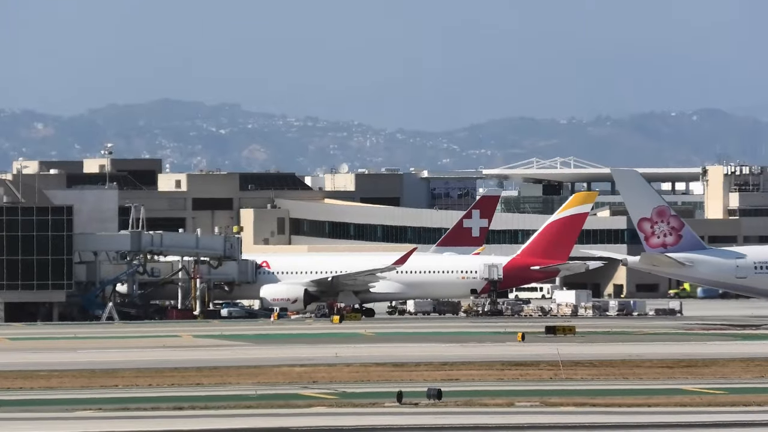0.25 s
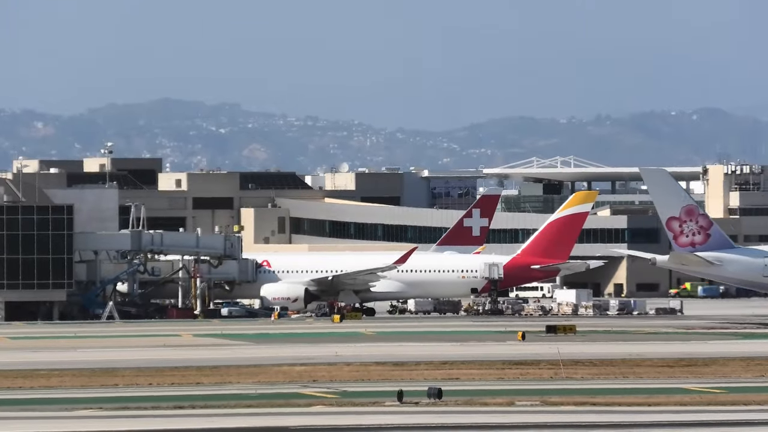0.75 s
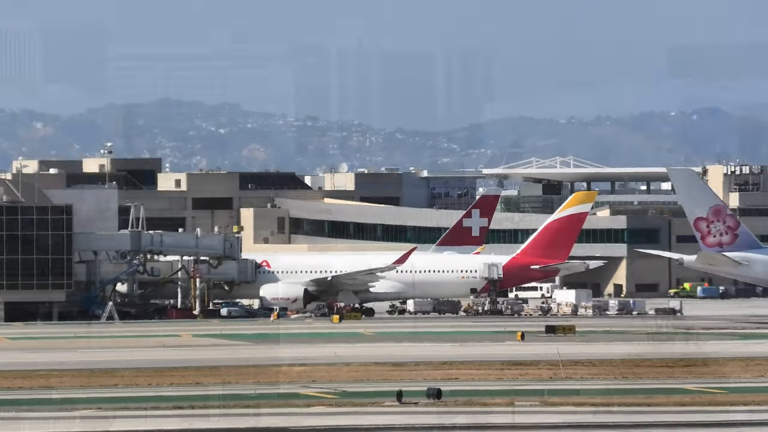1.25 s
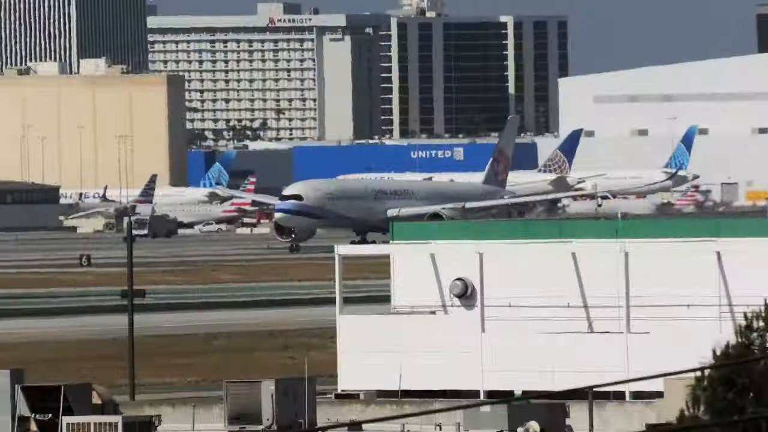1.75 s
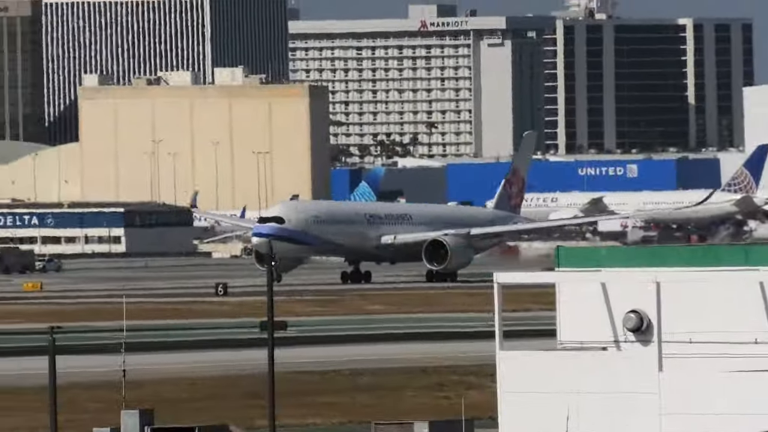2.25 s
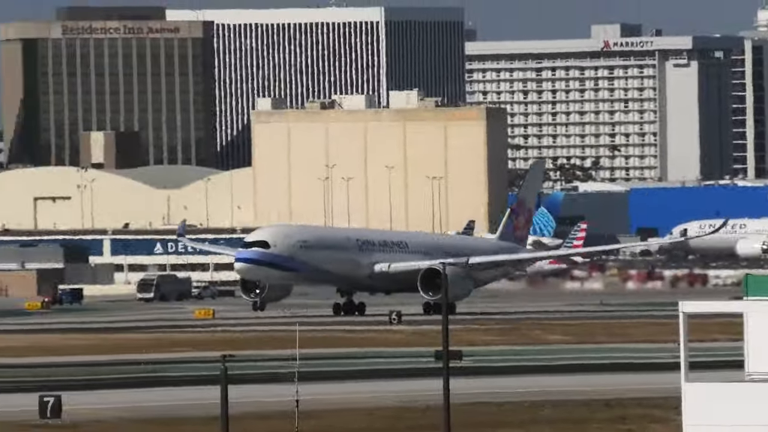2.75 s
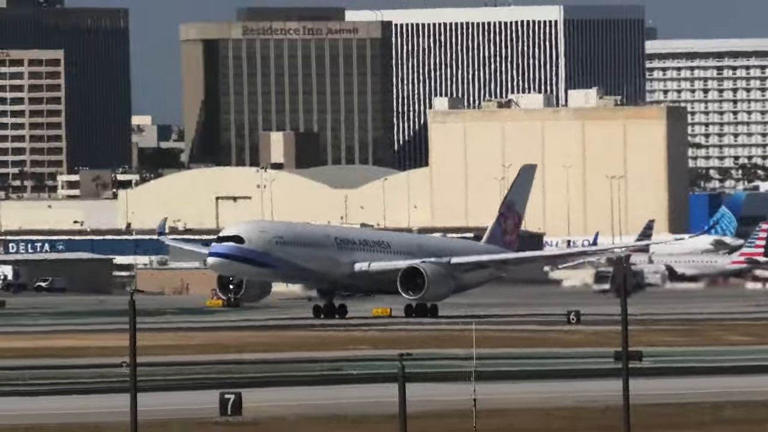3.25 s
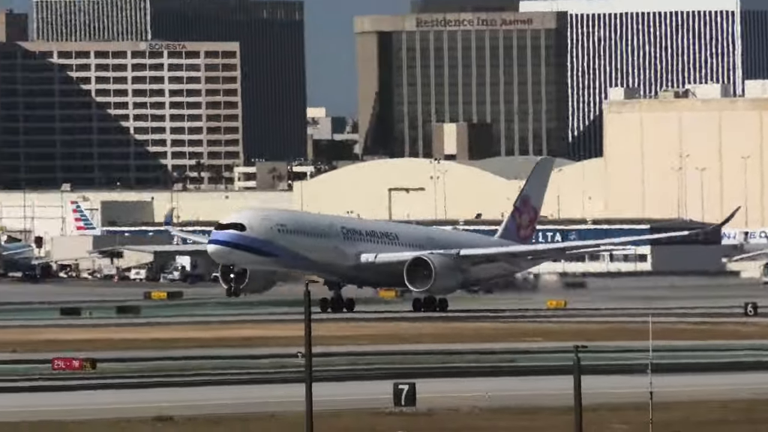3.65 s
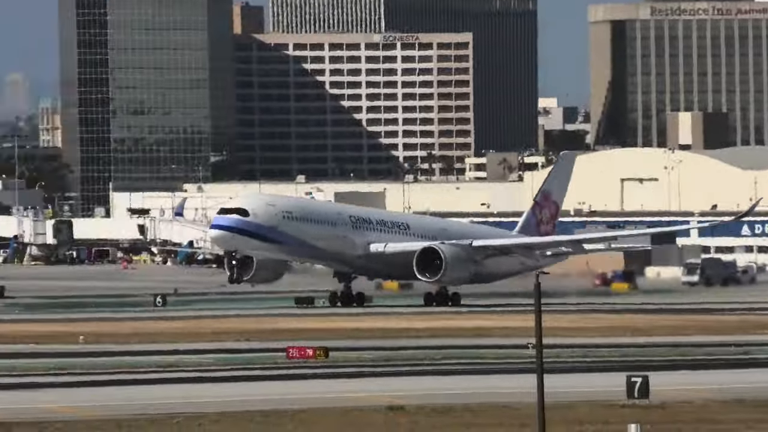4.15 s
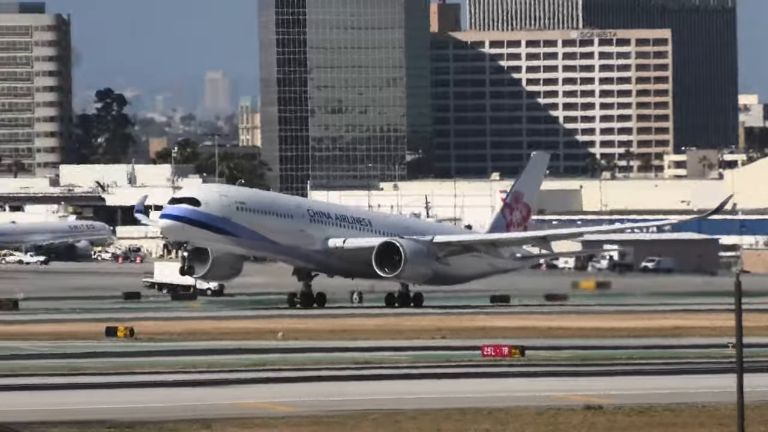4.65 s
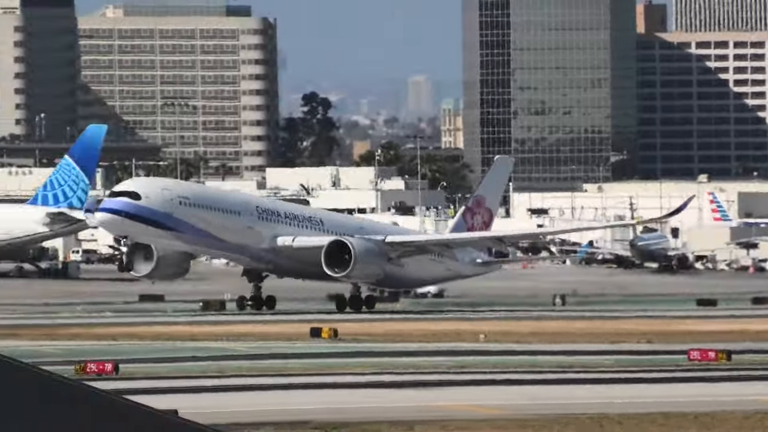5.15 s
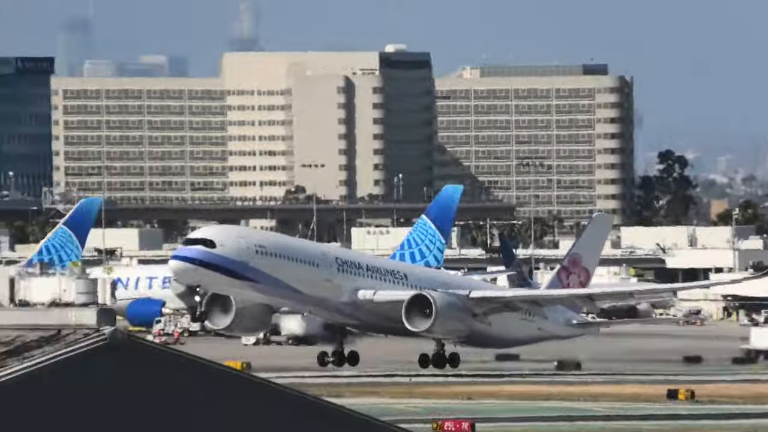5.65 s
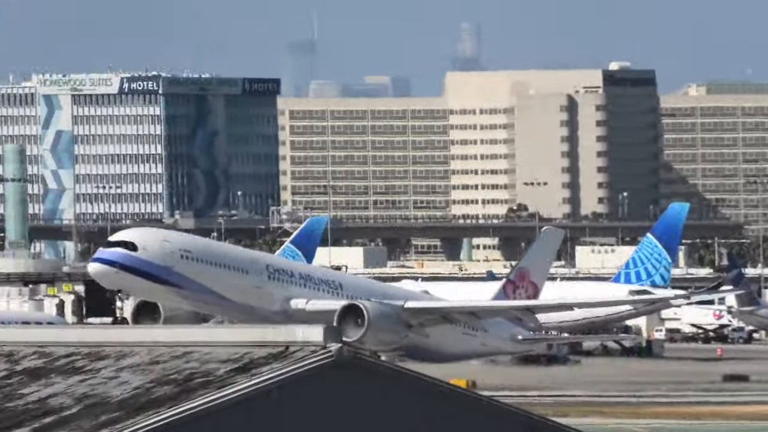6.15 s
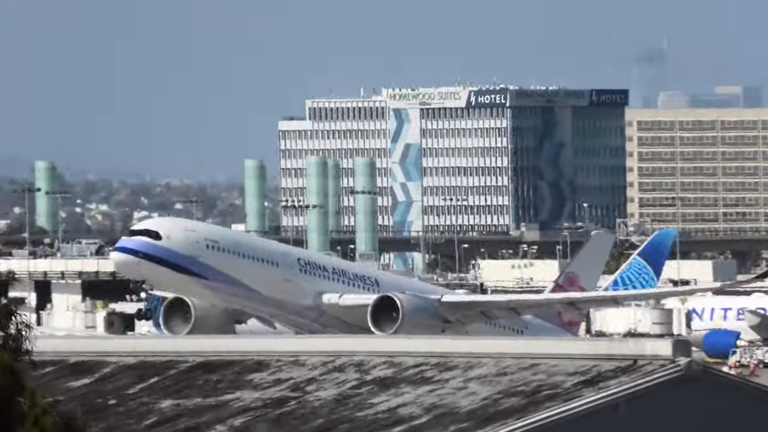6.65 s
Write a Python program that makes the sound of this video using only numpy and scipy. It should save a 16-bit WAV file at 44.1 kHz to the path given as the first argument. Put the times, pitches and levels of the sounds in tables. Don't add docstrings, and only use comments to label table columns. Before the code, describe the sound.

A jet's buzz-saw drone fades out, then gusty wind batters the microphone as a second jet's broad roar swells, lifts off and holds.

```python
import sys
import numpy as np
from scipy import signal
from scipy.io import wavfile
from scipy.ndimage import uniform_filter1d, minimum_filter1d

SR = 44100
rng = np.random.default_rng(int(sys.argv[2]) if len(sys.argv) > 2 else 0)


def convert_level_to_amplitude(level_db):
    exponent = np.asarray(level_db, float) / 20
    return 10 ** exponent


def inscribe(sig):
    pcm = np.round(np.clip(np.atleast_2d(sig).T, -1, 1) * 32767)
    wavfile.write(sys.argv[1], SR, pcm.astype(np.int16))


N = 303849

# (t/s, roar level/dB, exhaust rumble over roar/dB)
FIRST_PASS = [
    (0.0, -22.5, 2),
    (0.13, -22, -3.5),
    (0.27, -19.5, -1.5),
    (0.6, -23.5, 5),
    (1.06, -24.5, 5.5),
    (1.4, -27, -3),
    (1.556, -25.5, 2.5),
    (1.71, -37, 10),
    (1.77, -59, 9),
]


def evened(x):
    return x / np.sqrt(np.mean(x ** 2) + 1e-20)


def read(points, hz):
    f, value = np.transpose(points)
    return np.interp(np.log(hz + 1), np.log(f + 1), value)


def follow(rows, t):
    s, *columns = np.transpose(rows)
    return [np.interp(t, s, c) for c in columns] + [(t >= s[0]) & (t <= s[-1])]


def bump(x, width):
    return np.exp(-(x / width) ** 2)


def log_bump(hz, mid_hz, width):
    return bump(np.log((hz + 1) / mid_hz), width)


def shelf(hz, lo_hz, hi_hz):
    return np.clip(np.log((hz + 1) / lo_hz) / np.log(hi_hz / lo_hz), 0, 1)


def drift(shape, spans):
    x = rng.standard_normal(shape)
    for axis, size in enumerate(spans):
        for _ in range(2):
            x = uniform_filter1d(x, size=size, axis=axis)
    return evened(x)


def noise(colour_db, ref_hz, patchy_db, flicker_db, size=1024):
    hop = size // 4
    t = np.arange(N // hop + 5)[:, None] * hop / SR
    hz = np.fft.rfftfreq(size, 1 / SR)
    gain = convert_level_to_amplitude(colour_db(t, hz) + 0 * t)
    band = (hz > ref_hz[0]) & (hz < ref_hz[1])
    gain = gain / np.sqrt((gain[:, band] ** 2).sum(axis=1, keepdims=True))
    patches_db = patchy_db * drift(gain.shape, (5, 8))
    gain = gain * convert_level_to_amplitude(patches_db + flicker_db * drift(t.shape, (3,)))
    z = rng.standard_normal(gain.shape) + 1j * rng.standard_normal(gain.shape)
    sound = signal.istft((z * gain).T, nperseg=size, noverlap=size - hop)[1][:N]
    return sound * np.sqrt(3 / 2)


def ducking_db(t):
    # (strongest push t/s, ducking/dB, length/s)
    gusts = [(0.056, 11, .08), (1.172, 11, 0.054), (1.247, 5, 0.17), (1.768, 14, 0.068),
             (1.823, 9.5, 0.075), (2.02, 8, 0.21), (2.138, 4.5, 0.15), (2.286, 9, .06), (2.362, 20, 0.034),
             (2.403, 16, 0.067), (2.505, 8, 0.13), (2.613, 8, 0.075), (2.655, 6.5, 0.15),
             (2.761, 8.5, 0.076), (2.86, 5, .06), (2.931, 9.5, 0.089), (2.99, 10, 0.074),
             (3.133, 11.5, 0.1), (3.235, 4, .12), (3.33, 2, 0.22), (3.548, 9.5, 0.088), (3.625, 6.5, 0.071),
             (3.92, 10, 0.11), (4.375, 3.5, 0.26), (4.725, 15, 0.055), (4.802, 15, 0.22), (5.088, 4, 0.1),
             (5.375, 4.5, 0.065), (5.745, 3, 0.11), (6.42, 3, .2)]
    rise = 0.31
    return sum(db * np.interp(t, [s - rise * length, s, s + (1 - rise) * length], [0, 1, 0])
               for s, db, length in gusts)


def wind_db(t):
    # (t/s, level/dB)
    strength = [(0.0, -17), (0.06, -10), (0.23, -31), (1.13, -23.5), (1.15, -8.5), (1.61, -23), (1.63, -18),
                (4.09, -15), (4.24, -31.5), (4.32, -17.5), (4.57, -29), (4.8, -13.5), (4.83, -21.5),
                (5.45, -23.5), (5.58, -25), (5.72, -24), (5.91, -26), (6.89, -20.5)]
    # (t/s, depth/dB)
    lulls = [(.33, 11), (.5, 6.5), (.87, 9), (1.87, 8), (2.44, 14), (2.79, 14.5), (2.87, 6), (3.02, 10),
             (3.18, 8), (3.57, 13), (3.95, 9), (5.68, 5), (6.0, 7), (6.5, 9)]
    lull_db = sum(db * bump(t - s, 0.029) for s, db in lulls)
    return follow(strength, t)[0] + 0.41 * ducking_db(t) - lull_db


def lobes_db(s, hz):
    # (f/Hz, width/log units, level/dB)
    lobes = [(1150, 0.26, -8.5), (2030, 0.55, -2)]
    # (t/s, length/s, band f/Hz, lift/dB)
    sweeps = [(0.068, .05, 2100, 4), (0.201, .07, 2200, 7), (.16, 0.065, 1250, 4.5),
              (0.303, 0.065, 1200, 8.5), (0.417, .08, 800, 4.5), (0.552, 0.055, 2100, 2),
              (0.702, 0.047, 3000, 3), (0.858, 0.088, 1150, 6), (1.03, 0.092, 850, 3.5),
              (1.023, 0.05, 2000, 3), (1.206, 0.033, 1200, -1), (1.404, 0.064, 2950, 5.5),
              (1.43, 0.089, 1150, 7), (1.55, 0.066, 2000, 8.5), (1.707, .06, 1900, 6)]
    rest_db = sum(db * log_bump(hz, mid_hz, width) for mid_hz, width, db in lobes)
    sweep_db = sum(db * bump(s - at, length) * log_bump(hz, mid_hz, 0.29)
                   for at, length, mid_hz, db in sweeps)
    return rest_db + sweep_db


def insect(t):
    # (t/s, peak/dB, f/Hz)
    chips = [
        (6.565, -44, 7910),
        (6.6328, -39, 7990),
        (6.6674, -42, 8450),
        (6.7244, -52, 7540),
        (6.7685, -45, 8610),
        (6.8004, -45, 8800),
        (6.8349, -36, 7860),
    ]
    out = np.zeros(N)
    for s, db, hz in chips:
        tones = np.sin(2 * np.pi * hz * t) + .5 * np.sin(2 * np.pi * 1.08 * hz * t)
        out += convert_level_to_amplitude(db - 11) * bump(t - s - .004, .004) * tones
    return out


def housing_ticks():
    # (t/s, peak/dB)
    ticks = [(0.3134, -45), (0.3217, -39), (0.3284, -33), (0.3344, -46), (0.3454, -49), (0.3496, -41),
             (0.3777, -33), (0.387, -42), (0.392, -43), (0.396, -48), (0.4114, -33), (0.4199, -35),
             (0.439, -37), (0.4474, -54), (0.4559, -42), (0.4693, -49), (0.4833, -35.5), (1.2082, -59),
             (1.2518, -42), (1.4027, -59), (1.436, -34), (1.4474, -51), (1.4654, -45), (1.4717, -55),
             (1.4774, -48), (1.493, -37), (1.4984, -46), (1.5026, -33), (1.5064, -44)]
    clicks = np.zeros(N)
    for s, db in ticks:
        clicks[round(s * SR)] = convert_level_to_amplitude(db + 8)
    return signal.lfilter(*signal.butter(2, [5500 / SR * 2, 11000 / SR * 2], "band"), clicks)


def lens_motor(t):
    # (start t/s, length/s, level/dB, step rate f/Hz)
    runs = [
        (5.05, .013, -73, 1000),
        (5.161, .022, -77, 1000),
        (5.944, .0116, -66, 1021),
        (5.9556, .008, -61, 1307),
        (5.9636, .011, -64, 1021),
        (5.9746, .007, -70, 1307),
    ]
    edge_s = .001
    out = np.zeros(N)
    for s, length, db, hz in runs:
        on = np.clip(np.minimum(t - s, s + length - t) / edge_s + .5, 0, 1)
        buzz = sum(np.cos(2 * np.pi * k * hz * (t - s)) * shelf(k * hz, 5000, 12000) for k in range(5, 16))
        out += on * convert_level_to_amplitude(db + 9.5) * buzz
    return out


def circuit_whine(t):
    # (f/Hz, level/dB)
    tones = [(7000, -88), (8000, -83), (10000, -82), (11000, -88), (12000, -88), (13000, -95), (15000, -98)]
    return (t < FIRST_PASS[-1][0]) * sum(convert_level_to_amplitude(db) * np.sin(2 * np.pi * hz * t) for hz, db in tones)


def wind(t):
    # (f/Hz, level/dB per Hz)
    buffet = [(4.7, -28), (8.0, -2), (32, 2.5), (75, -6), (139, -15), (165, -18), (246, -25.5),
              (330, -29.5), (421, -38.5), (500, -40), (650, -78.5), (1100, -120)]
    # (t/s, sharpness/dB)
    rasps = [(.6, 6), (1.37, 11), (1.54, 11), (2.2, 11.5), (2.29, 6), (2.35, 5.5), (2.47, 7), (2.56, 13.5),
             (2.73, 2), (2.9, 4.5), (3.07, 9), (3.23, 8.5), (3.52, 8), (3.75, 5.5), (3.93, -8), (4.15, 1),
             (4.97, 12), (5.3, 1), (6.3, 0)]

    def colour_db(s, hz):
        rasp_db = sum(db * bump(s - at, 0.028) for at, db in rasps)
        sharp_db = 1 - 1.5 - 0.45 * (wind_db(s) + 18.5) + rasp_db
        return read(buffet, hz) - 40 * shelf(hz, 500, 2500) + sharp_db * shelf(hz, 54, 130)

    return convert_level_to_amplitude(wind_db(t) + 3.5) * noise(colour_db, (10, 110), patchy_db=2.0, flicker_db=3.0, size=2048)


def second_jet(t):
    # (t/s, roar level/dB, treble over roar/dB)
    approach = [(1.05, -72, -25), (1.18, -40, -21.5), (1.5, -33.5, -31), (1.9, -37.5, -29),
                (2.25, -29, -29), (2.6, -37.5, -29.5), (2.9, -34.5, -29.5), (3.07, -31.5, -23),
                (3.3, -38.5, -23), (3.52, -31.5, -28), (3.86, -28, -25.5), (4.23, -21.5, -29),
                (4.6, -21.5, -27), (5.0, -26.5, -29), (5.4, -25, -29), (5.62, -20.5, -28),
                (6.27, -21, -30.5), (6.89, -24, -31)]
    # (f/Hz, level/dB per Hz)
    roar_spectrum = [(59, -36), (100, -14), (123, -11.5), (159, -17.5), (233, -5.5), (270, -13.5),
                     (313, -8), (447, -11.5), (758, -5.5), (2000, -15), (6660, -38.5), (9740, -50),
                     (15500, -60.5)]
    # (f/Hz, level over roar/dB, width/Hz)
    low_tones = [(242, -10, 2.87), (313.7, -8.5, 2.71), (674, -16, 9.86)]
    # (t/s, f/Hz, lift/dB)
    ground_echo = [(3.2, 1400, 1), (3.7, 1270, 5), (4.3, 1300, 1.5), (5.3, 1490, 1), (6.89, 1300, -1.5)]

    def colour_db(s, hz):
        level_db, treble_db, _ = follow(approach, s)
        rumble_db = -3 + .6 * np.maximum(-25 - level_db + .4 * ducking_db(s), 0)
        treble_db = treble_db + 0.18 * ducking_db(s)
        echo_hz, echo_db, _ = follow(ground_echo, s)
        return (read(roar_spectrum, hz) + echo_db * log_bump(hz, echo_hz, 0.31)
                + (treble_db + 24.0) * shelf(hz, 1400, 4200)
                + (rumble_db + 4.5) * (1 - shelf(hz, 230, 650)))

    level_db, *_, on = follow(approach, t)
    roar = noise(colour_db, (500, 2500), patchy_db=-0.5, flicker_db=1.18)
    hum = np.zeros(N)
    for hz, db, width in low_tones:
        loudness = convert_level_to_amplitude(db + 2.9 * drift(N, (5000,)))
        wavering_hz = hz + width * drift(N, (3000,)) / 2
        hum += loudness * np.sin(2 * np.pi * np.cumsum(wavering_hz) / SR)
    return on * convert_level_to_amplitude(level_db) * (roar + hum)


def fan_buzz(t, on):
    # (t/s, turns f/Hz)
    shaft = [(0, 93.3), (.5, 91.8), (1.1, 90.2), (1.27, 89.6), (1.33, 90.6), (1.77, 88.6)]
    # (multiple, level/dB)
    blades = [(10, -5.5), (11, 0.5), (12, 4.5), (13, 6), (14, 0), (15, -6.5), (16, -3), (17, -9.5),
              (18, -20), (19, -11), (20, -11), (21, -17.5), (22, -10.5), (23, -11), (24, -8), (25, -10.5),
              (26, -16.5), (27, -19), (28, -34), (29, -20), (30, -23.5), (31, -10.5), (32, -21), (33, -22),
              (34, -25.5), (35, -18), (36, -13.5), (37, -21.5), (38, -25.5), (39, -23.5)]
    turns = np.cumsum(follow(shaft, t)[0])[on] / SR
    high_orders = [(k, -32 - .5 * (k - 40)) for k in range(40, 52)]
    orders, blades_db = np.transpose(list(blades) + high_orders)
    steps = np.linspace(0, FIRST_PASS[-1][0], num=90)
    shape = (len(orders), 90)
    fading_db = 2.1 * drift(shape, (3, 3)) + 2.6 * drift(shape, (1, 3))
    orders_db = blades_db[:, None] + fading_db + 1.4 * lobes_db(steps, orders[:, None] * shaft[1][1])
    tones = np.zeros(len(turns))
    for k, db, phase in zip(orders, orders_db, rng.random(len(orders))):
        tones += convert_level_to_amplitude(np.interp(t[on], steps, db)) * np.sin(2 * np.pi * (np.round(k) * turns + phase))
    comb = np.zeros(N)
    comb[on] = evened(tones)
    return comb


def first_jet(t):
    # (f/Hz, level/dB per Hz)
    roar_spectrum = [(59, -22), (100, -11), (378, -4.5), (682, -10), (808, -11.5), (1160, -8),
                     (1370, -11.5), (1800, -13.5), (2580, -19.5), (2930, -13.5), (5510, -48.5),
                     (12300, -69.5), (15500, -99)]
    # (t/s, f/Hz)
    sinking_echo = [(0, 495), (.4, 420), (.7, 290), (1.1, 350), (1.77, 240)]

    def colour_db(s, hz):
        rumble_db = (follow(FIRST_PASS, s)[1] + 1.6) * (1 - shelf(hz, 380, 1200))
        echo_db = 2.34 * log_bump(hz, follow(sinking_echo, s)[0], 0.13)
        return read(roar_spectrum, hz) + rumble_db + echo_db + .6 * lobes_db(s, hz)

    level_db, *_, on = follow(FIRST_PASS, t)
    roar = noise(colour_db, (700, 3500), patchy_db=2.08, flicker_db=1.0)
    return on * convert_level_to_amplitude(level_db) * (convert_level_to_amplitude(-3.5) * roar + convert_level_to_amplitude(-2.5) * fan_buzz(t, on))


def scene():
    t = np.arange(N) / SR
    jets = (first_jet(t) + second_jet(t)) * convert_level_to_amplitude(-ducking_db(t))
    housing = housing_ticks() + lens_motor(t) + circuit_whine(t)
    return (jets + wind(t) + housing + insect(t))[None]


def limiter(dry):
    # (t/s, length/s)
    stops = [
        (1.177, .002),
        (2.36, .0015),
        (2.607, .004),
        (2.691, .0012),
        (2.978, .0018),
        (3.133, .0018),
        (3.228, .001),
    ]
    t = np.arange(N) / SR
    low = signal.filtfilt(*signal.butter(2, 200 / SR * 2), dry)
    hold = minimum_filter1d(np.minimum(0.3 / (abs(low) + 1e-9), 1), size=500)
    hold = uniform_filter1d(hold, size=400)
    give = 1 - sum(np.exp(-((t - s) / length) ** 4) for s, length in stops)
    mixed = low * hold + (dry - low) * give * hold ** .15
    mixed = mixed / (1 + (mixed / .45) ** 4) ** (1 / 4)
    fade_in = np.minimum(t / .001 + .2, 1)
    return signal.filtfilt(*signal.butter(1, 5 / SR * 2, "high"), mixed) * fade_in


def drop_faint_patches(mixed):
    z = signal.stft(np.pad(mixed, ((0, 0), (2048, 2048)), "reflect"), SR, nperseg=2048)[2]
    bands = z[0, :1024].reshape(32, 32, -1)
    over_db = 10 * np.log10((abs(bands) ** 2).mean(axis=1) + 1e-20) + 106
    over_db = over_db + 6.5 * drift(over_db.shape[1], (2,)) - 2.5 + 2.5 * drift(over_db.shape, (1, 1))
    kept = bands / (1 + convert_level_to_amplitude(-6 * np.clip(over_db, -20, 20)))[:, None]
    kept = np.vstack([kept.reshape(1024, -1), 0 * z[0, 1024:]])
    return signal.istft(kept, SR, nperseg=2048)[1][None, 2048:2048 + N]


def roll_off(x):
    return signal.sosfilt(signal.butter(12, 15790, fs=SR, output="sos"), x)


def record(dry):
    mix = drop_faint_patches(limiter(dry))
    return roll_off(mix)


dry = scene()
out = record(dry)
inscribe(out)
```